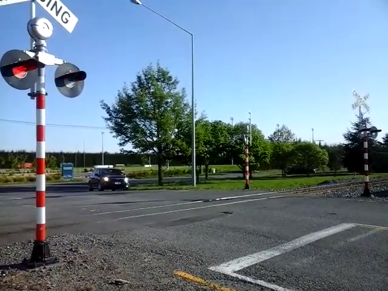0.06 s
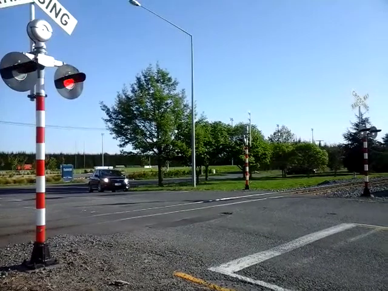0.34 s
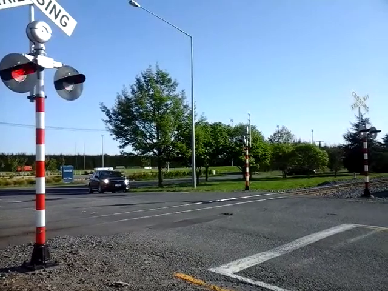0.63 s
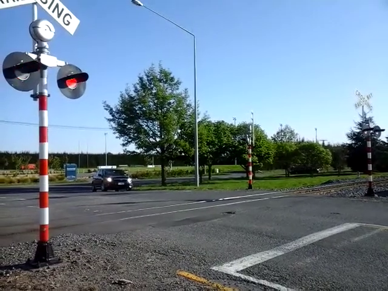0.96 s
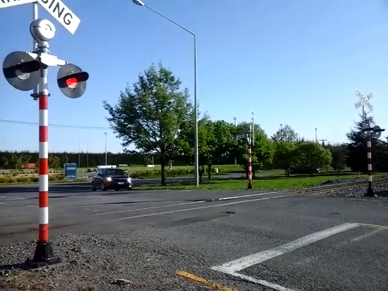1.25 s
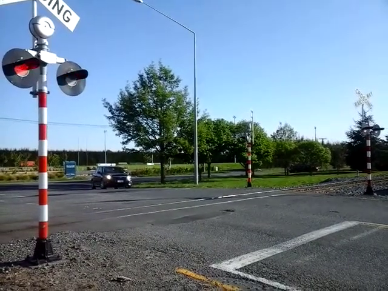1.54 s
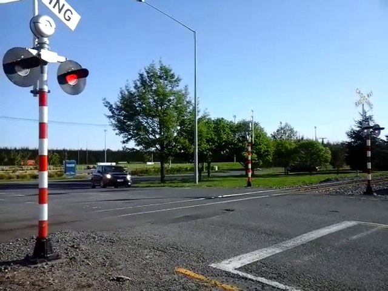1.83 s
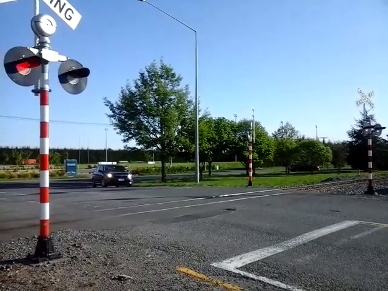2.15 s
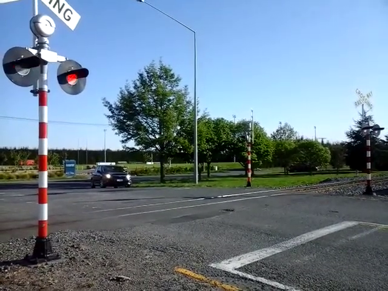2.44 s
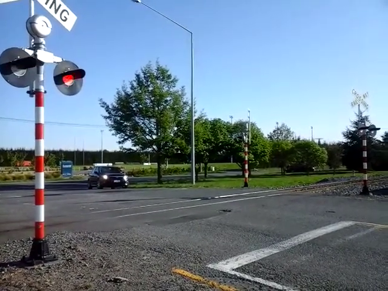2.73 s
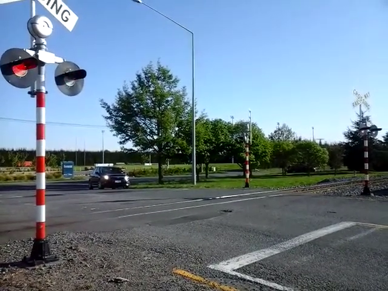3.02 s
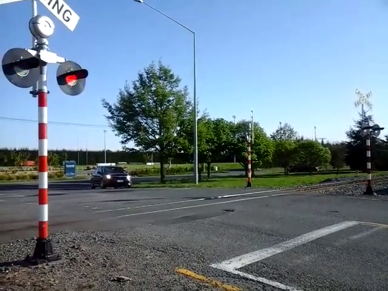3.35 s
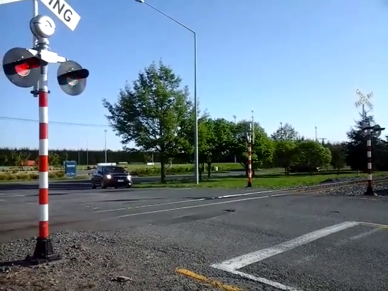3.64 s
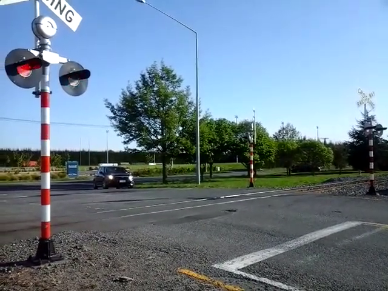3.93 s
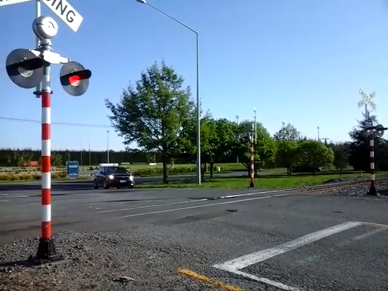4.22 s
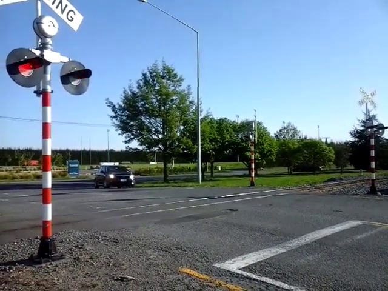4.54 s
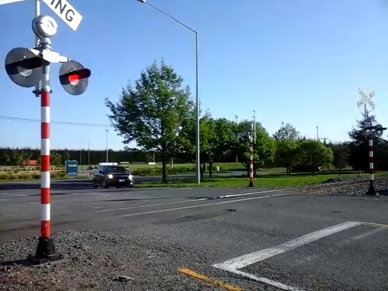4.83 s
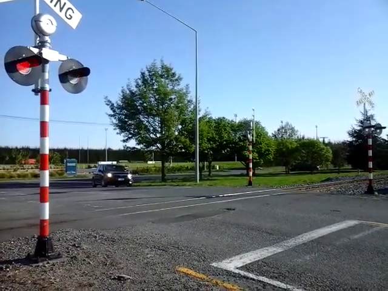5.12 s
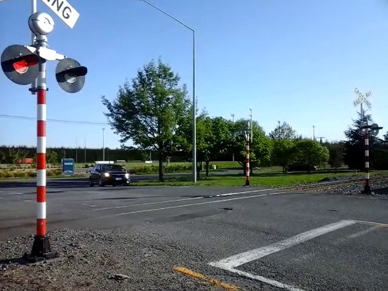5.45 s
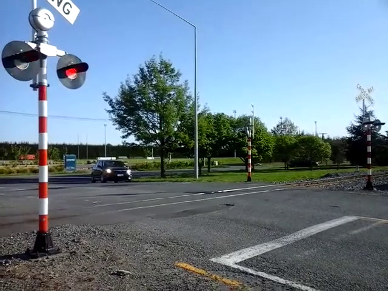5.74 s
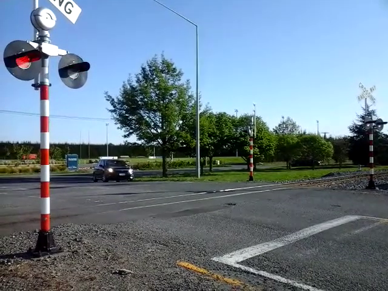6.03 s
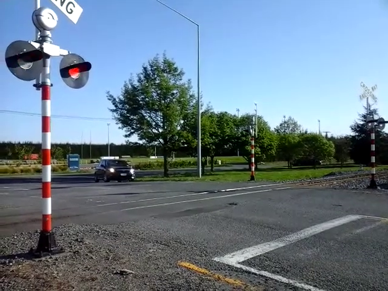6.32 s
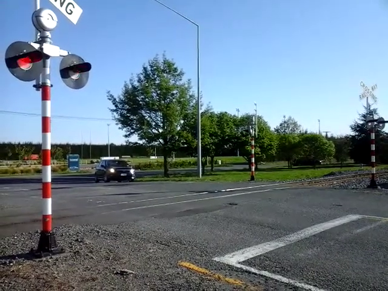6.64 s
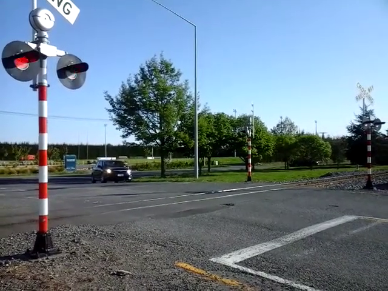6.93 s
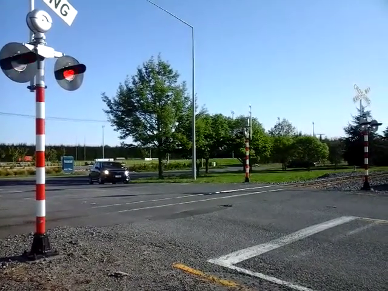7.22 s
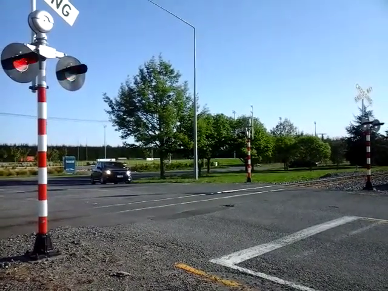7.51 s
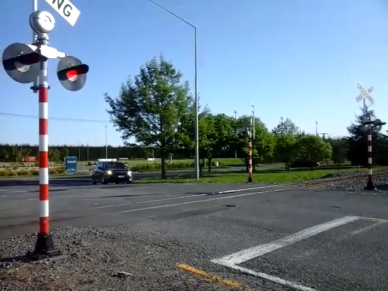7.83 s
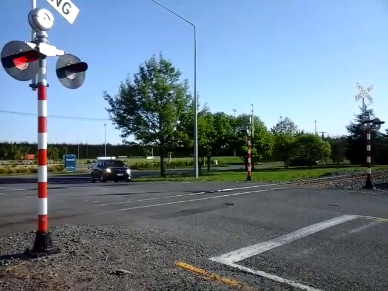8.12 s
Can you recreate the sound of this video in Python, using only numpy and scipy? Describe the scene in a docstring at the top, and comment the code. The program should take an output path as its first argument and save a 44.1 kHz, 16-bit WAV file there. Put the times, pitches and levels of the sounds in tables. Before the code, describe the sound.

Two mechanical level-crossing bells are already ringing at the start and keep going for the whole eight seconds, outdoors in open country. The near bell dominates: a hammer clacks dryly in its housing and hits a steel gong about 4.6 times a second, each stroke bright and sharp, with a tiny chatter and a lingering ring. The second bell, across the road, is weaker, duller and tuned slightly apart; its strokes drift in and out of step with the first. A short, thin echo trails both. Underneath, distant traffic rumbles faintly and evenly. Soft tyre noise from a departing car drops within the first half second, then slowly fades. Wind brushes the microphone with occasional small puffs, gusts more often from about 6 seconds, and is strongest from 7.7 seconds to the end, with low rumbling and short thumps.

```python
"""Two mechanical level-crossing bells clang out of step in open country, each about 4.6 strokes a second.
Up close, a clacking hammer hits a steel gong and chatters against it; the gong across the road is weaker
and tuned a little apart. A short outdoor echo trails both. Underneath, distant traffic rumbles and tyre
noise fades away, while gusts buffet the microphone more and more towards the end."""
import sys
import numpy as np
from scipy import signal
from scipy.fft import rfft, irfft, next_fast_len
from scipy.io import wavfile
from scipy.ndimage import uniform_filter1d

SR = 44100
rng = np.random.default_rng(int(sys.argv[2]) if len(sys.argv) > 2 else 0)


def put_to_file(sound):
    """Save the sound as 16-bit audio at rate SR, in the file named by the first command-line argument."""
    columns = np.atleast_2d(sound).T  # one column per channel
    safe = np.clip(columns, -1, 1)
    whole_steps = np.round(safe * 32767)
    wavfile.write(sys.argv[1], SR, whole_steps.astype(np.int16))


N = 360297
T = np.arange(N) / SR

# The tone of distant traffic. Each row: frequency in Hz, relative level in dB.
TRAFFIC_SPECTRUM = [(25, -12), (60, -3), (120, 0), (250, 0), (450, -1), (800, -3.5), (1200, -6), (2000, -9),
                    (2900, -16), (5000, -19), (8000, -30), (15000, -39)]
# The fader ride on the tyres of a car drawing away. Each row: time in seconds, level in dB.
TYRE_LEVELS = [(0, -32), (.25, -37), (.5, -41), (1.4, -45.5), (2.7, -41.5), (4.2, -46.5), (5, -46),
               (8.17, -54)]
# The tone of wind on the microphone. Each row: frequency in Hz, relative level in dB.
WIND_SPECTRUM = [(18, -59), (30, -18), (59, -19), (150, 0.5), (226, -2), (448, -6.5), (717, -23.5),
                 (770, -14), (900, -21), (1170, -34), (1980, -120)]
# The breeze between gusts. Each row: time in seconds, level in dB.
BREEZE_LEVELS = [(0, -43), (1.3, -58), (2.2, -43.5), (3.1, -42), (3.7, -46.5), (4.8, -48), (6.1, -50),
                 (6.6, -46.5), (7.4, -48), (8.17, -34.5)]
# Gusts on top of the breeze. Each row: peak time in seconds, level in dB, half-width in seconds.
GUST_SWELLS = [(0.173, -38.5, 0.054), (0.838, -39, 0.019), (1.688, -33.5, 0.016), (2.767, -35.5, 0.031),
               (3.163, -38.5, 0.041), (4.255, -32, 0.029), (5.42, -38.5, 0.034), (5.647, -41, 0.047),
               (5.738, -36.5, 0.037), (6.093, -40, 0.17), (6.27, -31, 0.058), (6.457, -35, .04),
               (6.966, -34.5, 0.036), (7.052, -35, 0.11), (7.186, -35.5, 0.039), (7.51, -34.5, .03),
               (7.627, -34, 0.022), (7.785, -27, 0.022), (7.869, -25.5, 0.027), (7.978, -23, .04),
               (8.062, -25, 0.037), (8.165, -29, 0.029)]
# Single eddies thumping the microphone.
# Each row: peak time in seconds, level in dB, pitch in Hz, half-width in seconds.
EDDY_THUMPS = [(0.349, -24.5, 258, 0.0039), (3.17, -26, 236, 0.0039), (4.245, -28, 207, 0.0064),
               (6.105, -23, 234, 0.0032), (6.25, -22, 282, 0.0052), (6.283, -15.5, 300, 0.0043),
               (6.475, -25, 255, 0.0051), (7.18, -21.5, 190, 0.0073), (7.628, -20.5, 250, 0.0031),
               (7.787, -14.5, 270, 0.0045), (7.864, -6, 260, 0.002), (7.965, -21, 277, 0.0034),
               (7.993, -7, 334, 0.0016), (8.047, -16, 300, 0.0026), (8.095, -19.5, 302, 0.011)]
# The tone of metal crashing on metal. Each row: frequency in Hz, relative level in dB.
CRASH_SPECTRUM = [(200, -24), (1100, -14), (1500, 1.5), (2000, -1.5), (2400, -0.5), (2900, -4.5),
                  (3700, -2.5), (5800, 4.5), (7400, -8), (8100, -7), (8800, -14), (15500, -18.5)]
# The far gong's ring. Each row: frequency in Hz, relative level in dB, 60 dB decay time in seconds.
FAR_GONG_MODES = [(548, -57, 5), (954.2, -48, 4), (1405, -46, 3), (1901, -35, 1.6), (2428, -30, 1.1),
                  (3636, -30, .3), (4295, -21, .3), (4620, -34, .12), (5000, -23, .14), (5530, -31, .14),
                  (5775, -28, .12), (6562, -26, .24), (7130, -30, .1), (7402, -31, .19), (8285, -41, .18),
                  (9230, -44, .2), (12335, -51, .15), (14640, -45, .15)]
# The far hammer's rhythm. Each row: start in seconds, relative force in dB.
FAR_HITS = [(0.087, 3), (0.287, 0.5), (0.492, 4), (0.699, 4.5), (0.905, -1.5), (1.117, 2), (1.331, -6.5),
            (1.537, -1.5), (1.75, -3), (1.952, 4), (2.178, 4), (2.372, 6), (2.592, 2), (2.807, -5),
            (3.022, 5), (3.238, 3.5), (3.474, 2), (3.684, 5), (3.893, -1.4), (4.124, 4.5), (4.326, 4.5),
            (4.55, 1), (4.79, 3), (4.999, -1.5), (5.213, 3.5), (5.429, 3), (5.638, 4), (5.854, 0),
            (6.051, 0), (6.275, 1), (6.492, 3.5), (6.701, 1), (6.906, -6), (7.113, 2.5), (7.318, 8),
            (7.553, 2), (7.781, -2.5), (7.993, 0.5)]
# The dry clack of the near hammer and its housing.
# Each row: frequency in Hz, relative level in dB, 60 dB decay time in seconds.
HOUSING_MODES = [(1298, -35, 0.046), (1513, -14.5, 0.039), (1549.5, -10.5, 0.028), (1725, -19, 0.036),
                 (2367, -22, 0.036), (2540, -22.5, 0.036), (2640, -34, 0.047), (3484, -25, 0.086),
                 (3873, -17, 0.031), (4060, -26, 0.048), (4800, -21, 0.093), (5200, -19.5, 0.051),
                 (5740, -17, 0.071), (5790, -18, 0.036), (7120, -21.5, 0.047), (8430, -28.5, 0.081)]
# The near gong's ring. Each row: frequency in Hz, relative level in dB, 60 dB decay time in seconds.
NEAR_GONG_MODES = [(535.5, -50, 5), (936.7, -45, 4.5), (1388.8, -39, 3), (1886.6, -29.5, 2.2),
                   (2433.5, -26.5, 1.4), (3020.2, -28.5, 1.1), (3539, -28, .2), (3654.7, -16, .57),
                   (4331, -16, .33), (4850, -23, .22), (4897, -14, .22), (5066, -18, .18), (5501, -26, .22),
                   (5830, -9.5, .16), (5994, -19, .24), (6132, -19.5, .3), (6651, -28, .3),
                   (6780, -26, .26), (7517.5, -20, .23), (7585, -29, .33), (7724, -39, .25),
                   (7899, -33, .3), (7978, -37, .3), (8699, -41, .25), (9157, -36, .2), (9388, -34, .26),
                   (10225, -41, .25), (10314, -40, .32), (10783, -38, .35), (11100, -39, .24),
                   (11461, -39, .26), (11886, -31, .14), (12574, -41, .25)]
# The near hammer's rhythm. Each row: start in seconds, relative force in dB,
# brightness (higher favours the modes near 5.8 kHz over 4.9 kHz), clack accent in steps of 0.73 dB.
NEAR_HITS = [(-0.03, 2.5, 1, 19), (0.1824, 1.5, 6, 5), (0.4024, -4, 23, 0.5), (0.6104, -2, -2, -8.5),
             (0.8154, 1.2, -6, 2), (1.027, -1, 0, -4), (1.2495, 1.5, 7, 4.5), (1.47, -0.4, 2, 2),
             (1.6835, 2.5, -3, 4.5), (1.8955, 0.6, 3, 1.5), (2.121, -1.5, 7.5, -6.5), (2.3355, 0.7, 2, -2),
             (2.552, -2, -4, -8), (2.764, 2.5, -7, -3.5), (2.977, -1.3, 3.5, -5.5), (3.1975, 1.2, 1, -13),
             (3.3951, -1, 6, -5), (3.6106, 0, 28, 4.5), (3.8131, 0.3, 1, 1), (4.0291, 0.5, -2, 3),
             (4.2461, 0, 4, -3.5), (4.4607, 3, -0.5, 4.5), (4.6707, 2, 4.5, 9), (4.8842, 1.6, -2, -9.5),
             (5.1022, -0.5, 7.5, 4), (5.3042, 0.6, 7, 2.5), (5.5267, 1.3, 1, -2.5), (5.7492, 0.3, 3, 7.5),
             (5.9722, 3, -6, -11), (6.2037, 1, -7, -9), (6.4257, 1.7, -4, -3.5), (6.6457, -0.5, 14, -1.5),
             (6.8607, 1, 19, -0.5), (7.0627, 2, -6.5, -4), (7.2788, -3.5, 18, -9), (7.4938, -2, -5, -8),
             (7.7118, 2, 3, 1.5), (7.9193, 1, 5.5, 3), (8.1303, -0.8, -4, -6)]


def undb(db):
    """Decibels to gain."""
    return 10 ** (np.asarray(db) / 20)


def curve(rows):
    """A fader ride: straight lines between points of time in seconds and value."""
    return np.interp(T, *np.transpose(rows))


def fade(t, t60):
    """Exponential decay, 60 dB down after t60."""
    return np.exp(-np.log(1000) * t / t60)


def noise(spectrum):
    """Noise of rms 1, coloured by points of frequency in Hz and level in dB."""
    hz, db = np.transpose(spectrum)
    size = next_fast_len(N)
    log_bins = np.log(np.maximum(np.fft.rfftfreq(size, 1 / SR), 1))
    gain = undb(np.interp(log_bins, np.log(hz), db))
    coloured = irfft(rfft(rng.standard_normal(N), size) * gain, size)[:N]
    return coloured / coloured.std()


def wander(rate_hz):
    """Smooth random movement with a spread near 1."""
    hold = int(SR / rate_hz)
    steps = np.repeat(rng.standard_normal(N // hold + 1), hold)
    return np.sqrt(2) * uniform_filter1d(uniform_filter1d(steps, hold), hold)[:N]


def road():
    """The bed: far traffic rumbles almost evenly while the tyres of a passing car fade away."""
    traffic = noise(TRAFFIC_SPECTRUM) * undb(-44.5 + 0.41 * wander(rate_hz=1.27))
    tyres = noise([(60, -20), (300, -4), (850, 8.5), (1400, -2.5), (3000, 2), (12000, -21)])
    return traffic + tyres * undb(curve(TYRE_LEVELS))


def wind():
    """Gusts swell out of a breeze and shed eddies at the microphone: rumble, rush and short thumps."""
    power = undb(curve(BREEZE_LEVELS)) ** 2
    for peak, db, width in GUST_SWELLS:
        power += (undb(db) * np.exp(-((T - peak) / width) ** 2)) ** 2
    flutter_db = 4 * wander(rate_hz=69.88)
    flow = np.sqrt(power) * undb(flutter_db)
    rumble = noise(WIND_SPECTRUM) * flow
    rush = noise([(200, -25), (450, 0), (750, -8), (1300, -26), (2500, -80)])
    rush *= undb(-5.5) * flow ** 1.56  # grows faster than the rumble: strong gusts are brighter
    thumps = np.zeros(N)
    for peak, db, hz, width in EDDY_THUMPS:
        span = np.abs(T - peak) < 4 * width
        t = T[span] - peak
        cycles = hz * t * (1 - 0.041 * t / width) + rng.random()  # the eddy slows as it passes
        thumps[span] += undb(db) * np.exp(-(t / width) ** 2) * np.sin(2 * np.pi * cycles)
    return rumble + rush + thumps


def outdoor_echo(direct):
    """Road, masts and trees scatter the clangs: the direct sound plus a thin, short tail."""
    t = T[:SR // 2]
    predelay_s = 0.0089
    echo = rng.standard_normal(len(t)) * fade(t, t60=0.28) * (t > predelay_s)
    return direct + undb(-17.5) * signal.fftconvolve(direct, echo / np.linalg.norm(echo))[:N]


def hammer_strokes(hits, lead_in=8):
    """The columns of a hit table, led in by earlier strokes so that the bell is already ringing."""
    rows = np.array(hits, float)
    period = np.mean(np.diff(rows[:, 0]))
    earlier = np.zeros((lead_in, rows.shape[1]))
    earlier[:, 0] = rows[0, 0] - period * np.arange(lead_in, 0, -1)
    times, *columns = np.vstack([earlier, rows]).T
    jitter = .0002 * rng.standard_normal(len(times))  # the hammer is never quite punctual
    return times + jitter, *columns


def blows(times, sizes):
    """One impulse for each blow that falls in the scene."""
    impulses = np.zeros(N)
    at = np.round(times * SR).astype(int)
    inside = (at >= 0) & (at < N)
    impulses[at[inside]] = sizes[inside]
    return impulses + 1e-18


def ring(times, sizes, hz, t60, rise_s):
    """One mode under a row of blows: each adds to or partly cancels what still rings."""
    pole = -np.log(1000) / t60 + 2j * np.pi * hz
    early = times < 0
    still_ringing = np.sum(sizes[early] * np.exp(-pole * times[early]))
    ringing, _ = signal.lfilter([1], [1, -np.exp(pole / SR)], blows(times, sizes), zi=[still_ringing])
    # the attack: the resonance fills as the blow spreads through the metal
    keep = np.exp(-1 / (rise_s * SR))
    return signal.lfilter([1 - keep], [1, -keep * np.exp(2j * np.pi * hz / SR)], ringing).imag


def strike(modes, times, force_db, scatter_db, rise_s, brightness=0):
    """Struck metal: the contact point varies, so each mode gets its own share and lag on each blow."""
    body = np.zeros(N)
    for hz, db, t60 in modes:
        # the contact point trades energy between the two strongest groups of modes
        lean = np.interp(hz, [4400, 4900, 5300, 5830, 7000], [0, -.4, 0, .5, .1])
        # short waves on the metal feel a shift of the hammer most
        chance = rng.standard_normal(len(times)) * max(1, (hz / 6500) ** 1.2)
        share_db = np.clip(lean * brightness, -4, 5) + scatter_db * chance
        lag = .0003 * rng.random(len(times))
        body += ring(times + lag, undb(db + force_db + share_db), hz, t60, rise_s)
    return body


def crash(times, force_db, t60):
    """Ringing too dense to have a pitch: a sharp burst and a weak tail scattered by the surroundings."""
    hits = blows(times, undb(force_db))
    burst = signal.lfilter([1], [1, -fade(1 / SR, t60)], hits)
    tail = signal.lfilter([1], [1, -fade(1 / SR, t60=.25)], hits)
    return noise(CRASH_SPECTRUM) * (burst + undb(-21) * tail)


def overtones(low_hz, high_hz, db, t60, count):
    """Shimmer: a crowd of weak gong modes, unevenly spaced and unevenly strong."""
    pitches = low_hz + (high_hz - low_hz) * (np.arange(count) + rng.random(count)) / count
    levels = db + 3 * rng.standard_normal(count)
    return [(hz, level, t60) for hz, level in zip(pitches, levels)]


def far_bell():
    """The gong across the road, softer and duller, keeps its own pace and drifts against the near one."""
    times, force_db = hammer_strokes(FAR_HITS)
    gong = strike(FAR_GONG_MODES, times, force_db, scatter_db=2.45, rise_s=0.0015)
    lowpass = signal.butter(2, 7000, fs=SR, output="sos")
    dull_crash = signal.sosfilt(lowpass, crash(times, force_db, t60=0.11))
    return undb(-1.5) * gong + undb(-28) * dull_crash


def near_bell():
    """The hammer clacks in its housing, hits the steel gong and chatters against it once more."""
    times, force_db, brightness, accent = hammer_strokes(NEAR_HITS)
    bite = overtones(3300, 7200, db=-32, t60=0.14, count=7)
    sparkle = overtones(8500, 15600, db=-49, t60=0.26, count=40)
    sustain = overtones(3300, 7400, db=-47, t60=1.0, count=10)
    modes = list(NEAR_GONG_MODES) + bite + sparkle + sustain
    gong = strike(modes, times + .0006, force_db, scatter_db=2.54, rise_s=0.0014, brightness=brightness)
    clack = strike(HOUSING_MODES, times, 0.73 * accent, scatter_db=2.0, rise_s=0.0027)
    chatter_times = times + 0.0074 + 0.00048 * rng.standard_normal(len(times))
    touch_times = np.concatenate([times + 0.00036, chatter_times])
    touch_db = np.concatenate([force_db + 5, force_db])  # the first touch is the harder one
    contact = crash(touch_times, touch_db, t60=0.023)
    return undb(-1.42) * gong + undb(1.5) * clack + undb(-20) * contact


def scene():
    """The mono mix: both bells with their echo, over the wind and the road."""
    bells = outdoor_echo(near_bell() + far_bell())
    return (bells + wind() + road())[None]


def record(dry):
    """The microphone rounds the loudest clangs a little lopsidedly, thins the bass and cuts the top."""
    ceiling, low_cut_hz, high_cut_hz = .74, 50, 15600
    lopsided = dry + 0.04 * dry ** 2
    rounded = lopsided / (1 + (lopsided / ceiling) ** 4) ** (1 / 4)
    thinned = signal.sosfilt(signal.butter(2, low_cut_hz, "high", fs=SR, output="sos"), rounded)
    return signal.sosfilt(signal.ellip(8, .2, 70, high_cut_hz, fs=SR, output="sos"), thinned)


dry = scene()
out = record(dry)
put_to_file(out)
```